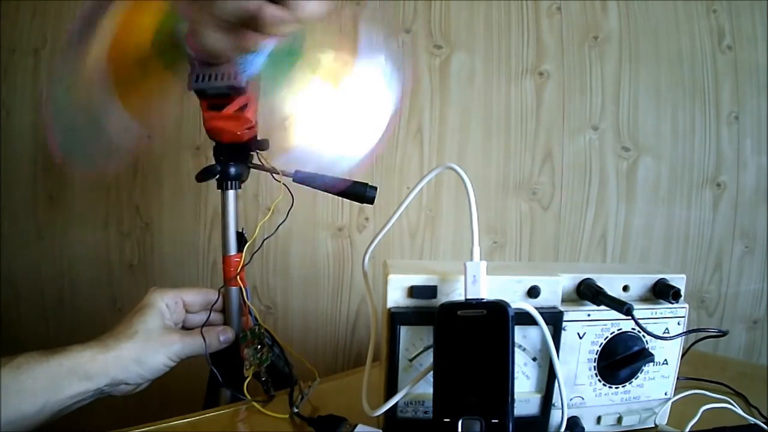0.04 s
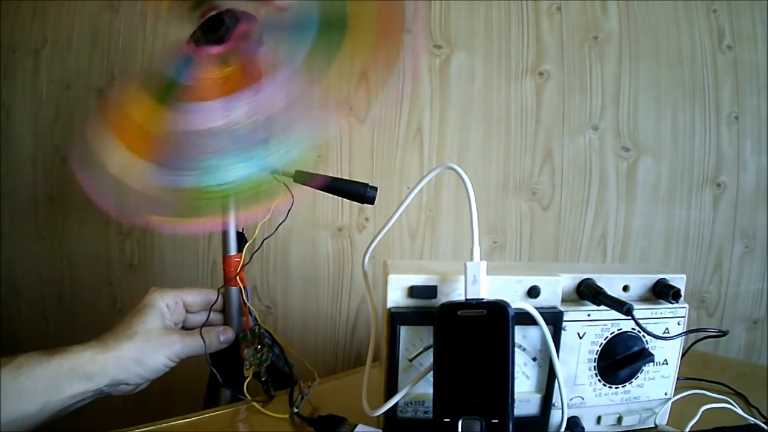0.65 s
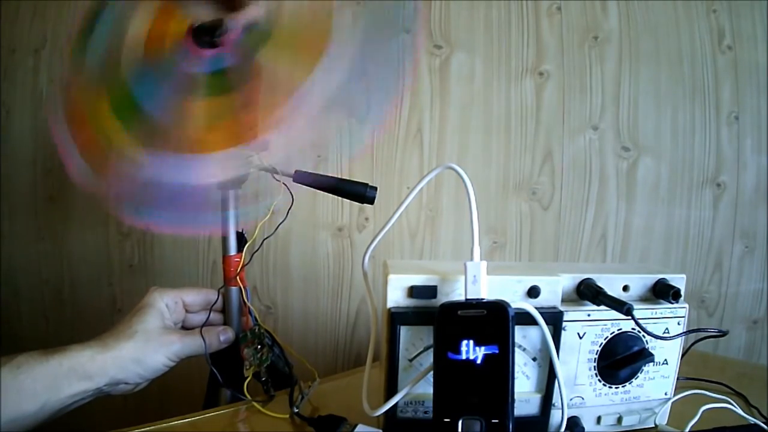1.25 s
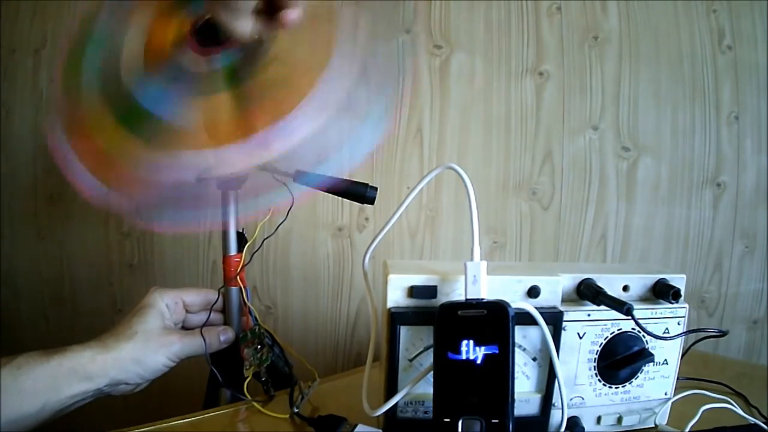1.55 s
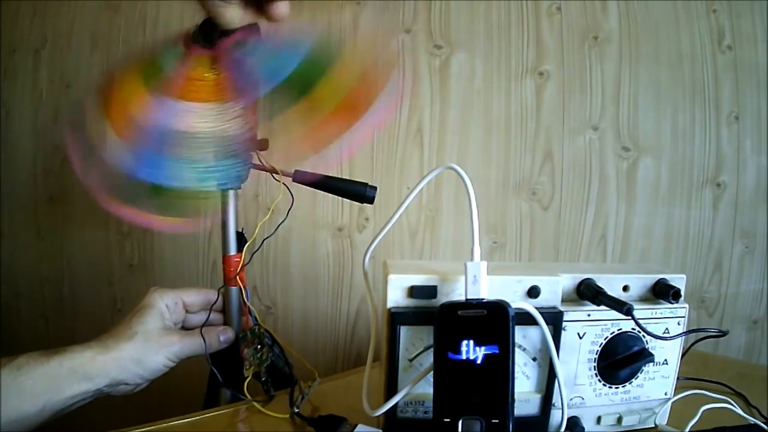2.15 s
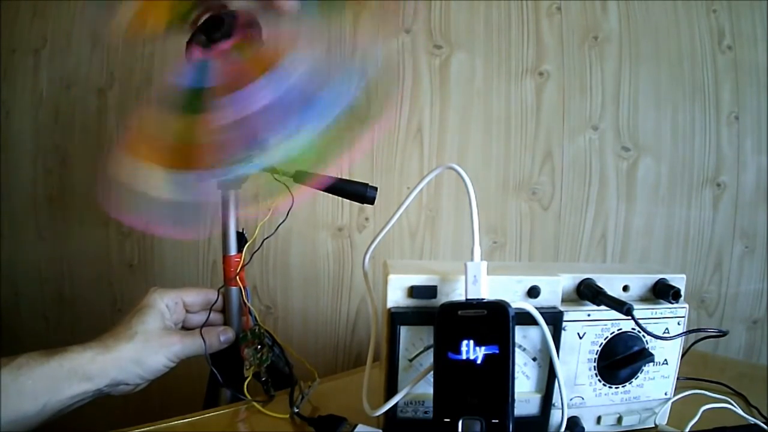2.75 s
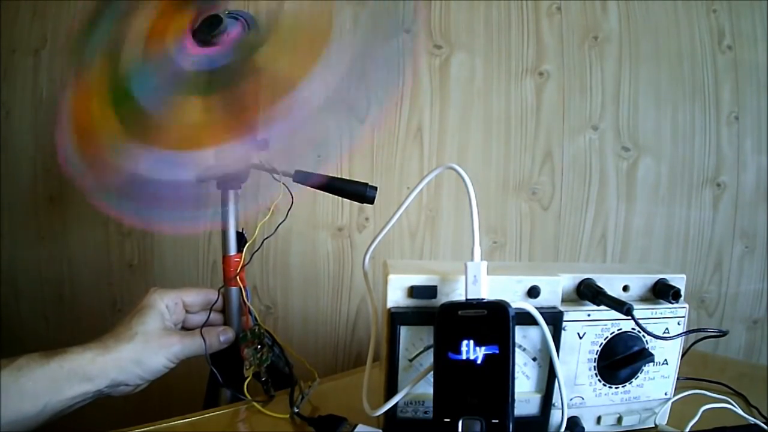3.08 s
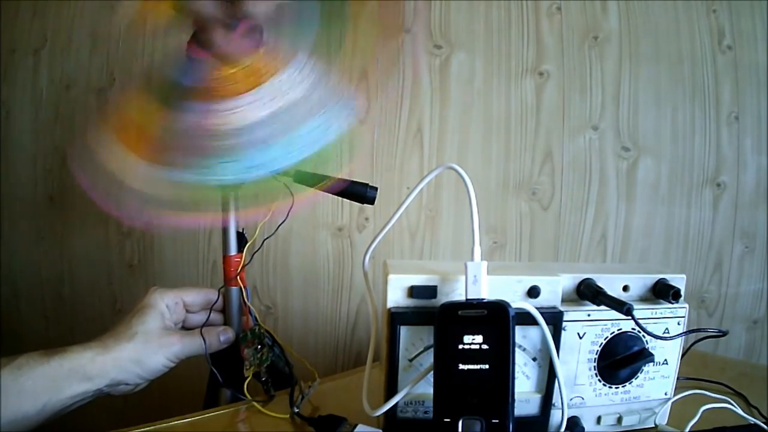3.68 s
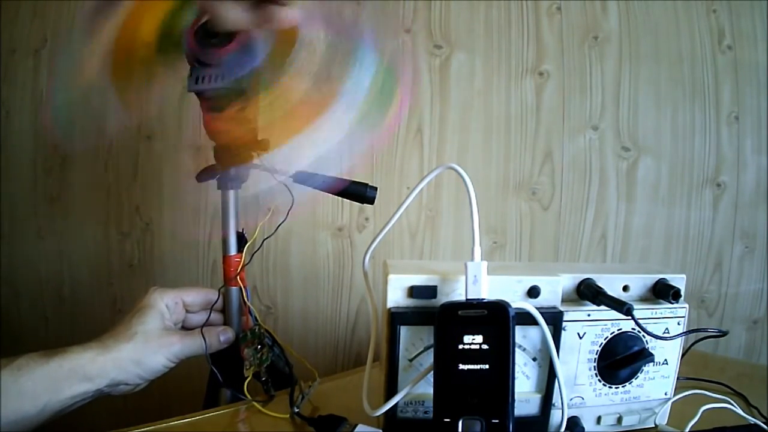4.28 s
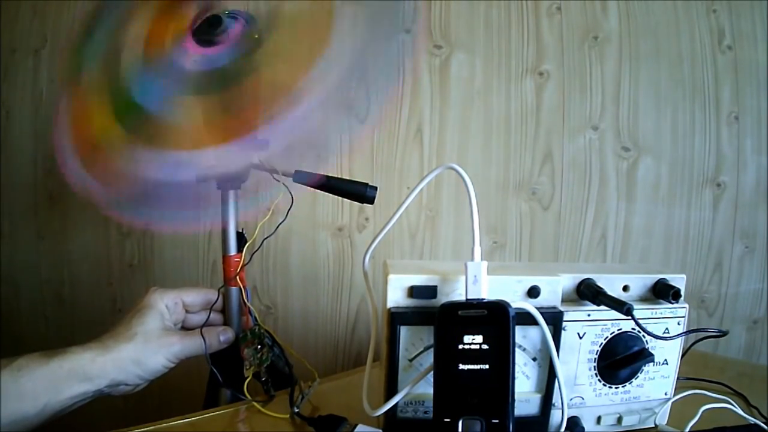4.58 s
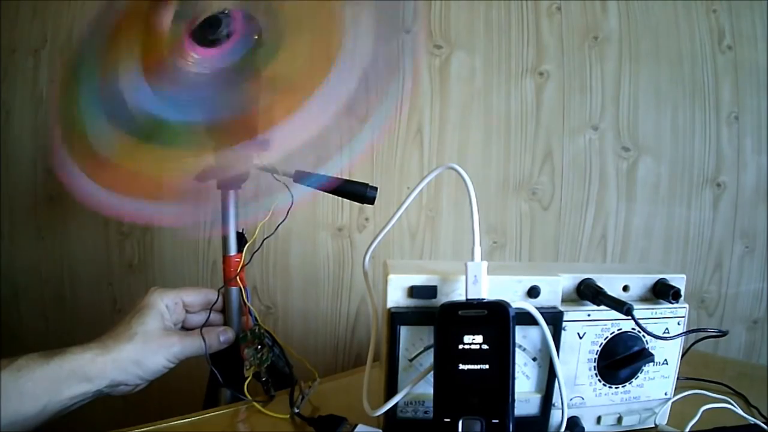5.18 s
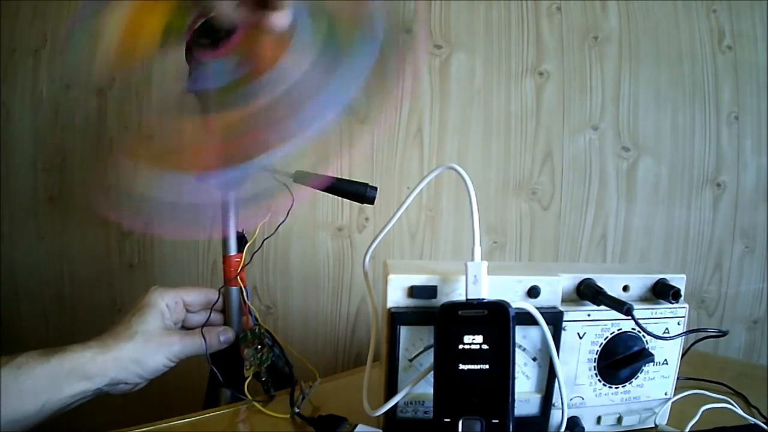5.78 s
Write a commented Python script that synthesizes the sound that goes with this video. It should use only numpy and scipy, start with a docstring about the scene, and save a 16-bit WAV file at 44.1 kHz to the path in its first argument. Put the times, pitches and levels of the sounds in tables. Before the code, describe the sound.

From the start to about 6 seconds, a finger flicks a plastic fan on a small motor round in a steady rhythm, four or five times a second. Each flick is a brief hiss of skin and a plastic rasp, with a hollow rattle of the housing and a clack of the shaft. The blades ring slightly and the rotor whirrs softly in between. The flicks are mostly lighter until about 2 seconds, then firmer, with sharper knocks around 2.5 seconds and from 3.5 to 4.6. Light fingernail taps come near 1.2, 2.5 and 5 seconds. The stand thumps dully through the table with the pushes, with the strongest low boom at about 5.2 seconds. Underneath run a low table rumble, soft room hiss and a faint, thin, fluttering electronic whine. It all sounds close, in a small room.

```python
"""A plastic fan on a small motor, used as a generator on a tripod, is flicked round in a small room.
In each flick a finger lands on the hub, rubs harder until the shaft snaps against its stop, and slides
off: the skin hisses, the plastic rasps, the housing rattles. The stand thumps through the table,
the blades ring and the rotor whirrs on. Underneath lie the low rumble of the handled table,
soft room hiss and the thin electronic whine of a camera."""
import sys
import numpy as np
from scipy import signal
from scipy.fft import rfft, irfft
from scipy.io import wavfile
from scipy.ndimage import uniform_filter1d

SR = 44100
rng = np.random.default_rng(int(sys.argv[2]) if len(sys.argv) > 2 else 0)


def store_wav(level_fs):
    """Save 16-bit WAV to argv[1]."""
    pcm = np.round(np.clip(np.atleast_2d(level_fs), -1, 1) * 32767)
    wavfile.write(sys.argv[1], SR, pcm.T.astype(np.int16))


N = 265923
T = np.arange(N) / SR

# Tone of the room hiss: freq_hz, gain_db
ROOM_TONE_EQ = [(100, 2.5), (200, -6), (350, -8.5), (600, -13), (1000, -19), (1400, -23), (1800, -22.5),
                (3000, -24.5), (5000, -28.5), (9000, -33), (13000, -31.5), (15500, -45)]
# Tone of the table rumble: freq_hz, gain_db
RUMBLE_EQ = [(8, 4), (22, -1), (38, -12), (55, -11), (75, -5), (125, -14.5), (170, -21), (300, -26.5),
             (900, -61.5)]
# How hard the hand shakes the table: time_s, level_db
RUMBLE_FADER = [(.3, -24.5), (.65, -30.5), (1, -27.5), (3, -26.5), (4, -24), (5.2, -27.5), (6, -25.5)]
# Camera whine, on multiples of its line rate: harmonic, level_db
WHINE_HARMONICS = [(1, -52), (2, -54.5), (3, -61.5), (4, -69), (5, -70), (6, -68), (7, -73), (8, -78),
                   (9, -80), (10, -78)]
# High whistle of the electronics: pitch_hz, level_db
WHISTLE_TONES = [(8737, -78), (8883, -73), (8955, -67), (9027, -68), (9098, -78)]
# Tone of the bearings: freq_hz, gain_db
WHIRR_EQ = [(100, -19.5), (250, 14.5), (480, -3.5), (620, 10), (900, -19), (1400, -21), (3000, -44),
            (8000, -46)]
# Boom of the stand and table: pitch_hz, level_db, t60_s
STAND_MODES = [(82, 0, .42), (71, -8, .3), (116, -13, .25), (137, -17, .2)]
# The holding hand shifts the stand between flicks: start_s, level_db
STAND_SHIFTS = [(.913, -24), (1.325, -23), (1.537, -21), (1.77, -28), (2.321, -27), (3.588, -25)]
# Ring of the blades: pitch_hz, width_hz, level_db
BLADE_MODES = [(628, 62, 6.5), (682, 33, -0.5), (731, 28, -2), (858, 31, -2.5), (906, 39, -6.5)]
# Wobbles of the freed rotor: peak_s, level_db
ROTOR_WOBBLES = [(0.216, -36), (.386, -38), (2.133, -39.5), (2.343, -38), (2.71, -36), (3.16, -43),
                 (3.592, -32.5), (3.763, -29.5), (4.25, -41), (4.48, -37.5), (4.839, -45), (5.072, -34.5)]
# Ring of the hub cap: pitch_hz, width_hz, level_db
HUB_MODES = [(2170, 250, -7), (2800, 250, -0.5), (3666, 150, 8), (4100, 1000, -5.5), (6200, 900, -11)]
# Light fingernail taps on the hub: start_s, level_db
NAIL_TAPS = [(1.2146, -36.5), (1.5133, -44), (2.473, -37), (5.0199, -34.5)]
# The loose shaft ticks on its own as it turns: start_s, level_db
LOOSE_TICKS = [(.891, -51), (1.166, -46.5), (1.328, -53), (1.516, -45.5), (2.286, -40)]
# Tone of the shell under a hard knock: freq_hz, gain_db
CLACK_EQ = [(100, -18), (300, 11.5), (500, -8.5), (750, 2), (1150, 7.5), (2200, -2.5), (3000, -6),
            (3800, -2), (4800, -14), (6500, -16.5), (9300, -28), (13000, -61), (16000, -96)]
# Tone of the shell under a soft fingertip: freq_hz, gain_db
BUMP_EQ = [(90, -35), (170, -2.5), (300, 7.5), (480, 6), (700, -10), (1000, -2), (1200, -2), (1600, -16.5),
           (2100, -13.5), (3000, -36.5), (6000, -45), (16000, -61)]
# Ring of the housing and blades: pitch_hz, width_hz, level_db
HOUSING_MODES = [(171, 164, -9), (221.4, 21, -4), (252.7, 28.6, 3.5), (335, 35, 2.5), (390, 29.5, 1.5),
                 (435, 64.6, 0), (502, 69, 0.5), (632, 113, -12), (869, 34, -9)]
# Tone of rubbed plastic: freq_hz, gain_db
RASP_EQ = [(400, -22), (750, -1), (1000, 2.5), (1200, 4), (1550, 2.5), (2000, -5), (2500, -4), (3000, -11),
           (3800, -9), (4800, -14.5), (6500, -19), (9000, -37), (16000, -38)]
# Bright tone of the skin hiss and the shaft's tick: freq_hz, gain_db
BRIGHT_EQ = [(1500, -58), (3500, 2.5), (6000, 4), (8000, 3), (9300, -5), (10500, 1.5), (12000, 1.5),
             (13400, 8), (14500, -8), (16000, -18)]
# Cue sheet, one flick a row; touch_db sets the first contact against the full grip:
# touch_s, snap_s, touch_db, push_db, rasp_db, skin_db, knock_db, thump_db
FLICKS = [(0.108, 0.1482, 2, -32.5, -50, -45, -34, -26.5), (0.329, .368, -5.5, -34.5, -41, -50, -48, -23),
          (0.752, 0.77, -5, -37.5, -51.5, -53, -58, -28.5),
          (0.942, 1.004, -9.5, -37.5, -48.5, -47, -44, -36),
          (1.207, 1.2158, -10, -26.5, -36, -49, -44, -27), (1.387, 1.421, 0.5, -38.5, -54, -58, -56, -28.5),
          (1.609, 1.662, -2, -38.5, -52.5, -69, -54, -32.5), (1.819, 1.859, 0, -38, -72, -54.5, -51, -31.5),
          (2.024, 2.0715, -16, -36.5, -45, -41, -40, -29.5), (2.22, 2.257, -8, -30.5, -38, -46, -44, -22.5),
          (2.432, 2.4752, -11, -28.5, -36.5, -52, -29.5, -28),
          (2.666, 2.687, 8, -41.5, -56.5, -57, -57, -28.5),
          (2.836, 2.8815, -15, -28, -33.5, -46.5, -36, -23),
          (3.051, 3.096, -5, -27, -35.5, -45.5, -42, -24),
          (3.269, 3.299, -2.5, -31.5, -46, -51, -43.5, -30),
          (3.475, 3.504, -16, -27.5, -41.5, -55, -34.5, -20.5),
          (3.698, 3.7285, -3, -30, -42, -47, -31, -20), (3.892, 3.918, -1, -27.5, -37, -48, -27.5, -25),
          (4.136, 4.154, -14.5, -26.5, -40.5, -45.5, -44, -31.5),
          (4.326, 4.3616, -33, -27.5, -29, -40, -28.5, -26.5),
          (4.554, 4.5814, -1.5, -26.5, -31.5, -47, -34.5, -22.5),
          (4.77, 4.803, -6, -31.5, -52, -49, -44, -27.5), (4.985, 5.0204, -9, -28, -40.5, -44.5, -35, -24),
          (5.203, 5.247, -5.5, -29.5, -40, -46, -38.5, -8),
          (5.418, 5.441, 1.5, -29.5, -45, -45.5, -36.5, -19),
          (5.632, 5.6564, -7, -27, -37, -45, -33.5, -27), (5.822, 5.868, -2, -25, -34, -47, -35.5, -18.5)]
TOUCH_S, SNAP_S, TOUCH_DB, PUSH_DB, RASP_DB, SKIN_DB, KNOCK_DB, THUMP_DB = np.transpose(FLICKS)


def undb(db):
    """Decibels to gain."""
    return 10 ** (np.asarray(db) / 20)


def unit_rms(x):
    """Scale to rms 1."""
    return x / np.sqrt(np.mean(x ** 2))


def decay(t, t60):
    """Exponential decay that starts at t = 0."""
    return (t >= 0) * np.exp(-np.log(1000) * np.maximum(t, 0) / t60)


def hits(times, levels_db, t60):
    """Envelope of sharp attacks that each die away."""
    return sum(undb(db) * decay(T - s, t60) for s, db in zip(times, levels_db))


def swells(times, levels_db, width_s):
    """Envelope of short bell-shaped swells."""
    return sum(undb(db) * np.exp(-(2 * (T - s) / width_s) ** 2) for s, db in zip(times, levels_db))


def wander(rate_hz):
    """Random modulation that glides from value to value, with a spread near 1."""
    return np.interp(T * rate_hz, np.arange(4096), rng.standard_normal(4096))


def slips(per_s, spread_db, even_s=0.037):
    """Tiny stick-slip clicks of uneven size, levelled to a power near 1 over even_s."""
    size = undb(spread_db * np.minimum(rng.exponential(size=N), 4))
    clicks = (rng.random(N) < per_s / SR) * size * rng.choice([-1, 1], N)
    power = np.abs(uniform_filter1d(clicks ** 2, int(even_s * SR)))
    return clicks / np.sqrt(power + 1e-9)


def ring(x, response):
    """Pass a sound through an impulse response."""
    return signal.fftconvolve(x, response)[:N]


def eq(x, curve, size=8192):
    """Minimum-phase EQ along a curve; keeps the energy of white noise."""
    hz, db = np.transpose(curve)
    bins_hz = np.arange(size // 2 + 1) * SR / size
    gain_db = np.interp(np.log(bins_hz + 1), np.log(hz), db)
    cepstrum = irfft(np.log(undb(gain_db)))
    cepstrum[1:size // 2] *= 2
    cepstrum[size // 2 + 1:] = 0
    response = irfft(np.exp(rfft(cepstrum)))
    return ring(x, response / np.linalg.norm(response))


def resonate(x, modes):
    """Ring a body's damped modes; keeps the energy of white noise."""
    t = T[:SR // 4]
    response = sum((-1) ** k * undb(db) * width * np.exp(-np.pi * width * t) * np.sin(2 * np.pi * hz * t)
                   for k, (hz, width, db) in enumerate(modes))
    return ring(x, response / np.linalg.norm(response))


def room(x, wet_db, low_t60=0.29, high_t60=0.21, split_hz=7500, predelay_s=0.003):
    """Direct sound plus the diffuse tail of a small room, whose top dies first."""
    t = T[:SR // 2] - predelay_s
    noise = rng.standard_normal(len(t))
    low = signal.sosfiltfilt(signal.butter(2, split_hz, fs=SR, output="sos"), noise)
    tail = low * decay(t, low_t60) + 0.63 * (noise - low) * decay(t, high_t60)
    reverb = ring(x, tail / np.linalg.norm(tail))
    return (x + undb(wet_db) * reverb) / np.hypot(1, undb(wet_db))


def jolts(lead_s=0.0058):
    """Pushes on the stand, just before each snap and from the holding hand: start_s, level_db."""
    return np.vstack([np.transpose([SNAP_S - lead_s, THUMP_DB]), STAND_SHIFTS])


def room_tone():
    """A steady bed of soft hiss."""
    return eq(rng.standard_normal(N), ROOM_TONE_EQ) * undb(-44.5)


def table_rumble(jolt_share=0.32):
    """The handled table rumbles deeply and swells after each jolt."""
    times, levels_db = jolts().T
    shake = unit_rms(uniform_filter1d(hits(times, levels_db / 2, t60=0.21), size=900))
    handling = undb(np.interp(T, *np.transpose(RUMBLE_FADER)))
    return eq(rng.standard_normal(N), RUMBLE_EQ) * handling * (1 - jolt_share + jolt_share * shake)


def camera_whine(frame_hz=22.76, line_hz=1443, duty=0.69, first_frame_s=0.0312):
    """The camera's read-out whines and pauses once a frame, beside a faint steady whistle."""
    frame_phase = ((T - first_frame_s) * frame_hz) % 1
    gate = uniform_filter1d(1. * (frame_phase < duty), size=30)
    line_cycles = line_hz * frame_phase / frame_hz
    whine = sum(undb(db) * np.sin(2 * np.pi * (k * line_cycles + rng.random()))
                for k, db in WHINE_HARMONICS)
    whistle = sum(undb(db) * np.sin(2 * np.pi * (hz * T + rng.random())) for hz, db in WHISTLE_TONES)
    return np.sqrt(2) * (gate * whine + whistle)


def rotor_whirr(coast_t60=0.54):
    """Each flick speeds the rotor up; its bearings whirr and fade as it coasts."""
    speed = hits(SNAP_S, PUSH_DB / 2, coast_t60)
    friction = slips(900, 1.9) * speed * undb(4.6 * wander(35))
    return room(eq(friction, WHIRR_EQ), wet_db=-6.5) * undb(-30.5)


def stand_thumps(attack_s=0.029, rebound_s=0.055, rebound_db=-13):
    """Soft pushes of the hand rock the stand, which booms through the table and rocks back once."""
    t = T[:SR]
    boom = sum(undb(db) * decay(t, t60) * np.sin(2 * np.pi * hz * t) for hz, db, t60 in STAND_MODES)
    pushes = np.zeros(N)
    for start_s, db in jolts():
        pushes[int(start_s * SR)] += undb(db)
        pushes[int((start_s + rebound_s) * SR)] += undb(db + rebound_db)
    return ring(pushes, boom * np.minimum(t / attack_s, 1)) * undb(7)


def blade_chatter(shake_db=-14.5):
    """The shaft chatters in its bearing and rings the blades, at each snap and as the rotor wobbles."""
    shakes = swells(SNAP_S, THUMP_DB + shake_db, width_s=0.024)
    wobbles = swells(*np.transpose(ROTOR_WOBBLES), width_s=0.037)
    return room(resonate((shakes + wobbles) * slips(1200, 2.1), BLADE_MODES), wet_db=-11)


def nail_taps():
    """A nail catches the hub cap, which rings briefly."""
    contact = hits(*np.transpose(NAIL_TAPS), t60=0.024) * slips(7300, 1.3, even_s=0.0036)
    return room(resonate(contact, HUB_MODES), wet_db=-6) * undb(12.5)


def shaft_knocks(clack_lag_s=0.00078):
    """The shaft hits its stop or knocks loosely: a bright tick, then the clack of the plastic shell."""
    times, levels_db = np.vstack([np.transpose([SNAP_S, KNOCK_DB]), LOOSE_TICKS]).T
    tick = hits(times, levels_db, t60=0.017)
    clack = hits(times + clack_lag_s, levels_db, t60=0.038)
    # each contact builds over a few milliseconds and is a burst of tiny bounces
    tick = uniform_filter1d(tick, size=130) * slips(6000, 3.5, even_s=0.003)
    clack = uniform_filter1d(clack, size=150) * slips(4000, 3, even_s=0.005)
    tick = room(eq(tick, BRIGHT_EQ), wet_db=-5) * undb(9)
    clack = room(eq(clack, CLACK_EQ), wet_db=-4.5) * undb(11.5)
    return tick + clack


def fingertip_bumps(t60=0.079, snap_lag_s=0.008, lift_lag_s=0.042):
    """A soft fingertip draws a dull clack from the hollow shell: on landing, at the snap, on lifting."""
    landing = hits(TOUCH_S, PUSH_DB + TOUCH_DB - 2, t60)
    snap = hits(SNAP_S + snap_lag_s, PUSH_DB - 6.5, t60)
    lift = hits(SNAP_S + lift_lag_s, PUSH_DB - 10.5, t60)
    contact = (landing + snap + lift) * slips(3000, 0.76, even_s=0.0039)
    return room(eq(contact, BUMP_EQ), wet_db=-2) * undb(5)


def finger_pressure(levels_db, hold_s, release_t60, touch_weight, grip_curve=1.5):
    """Envelope of one friction layer: sudden touch, grip tightening to the snap, hold, slide-off."""
    envelope = np.zeros(N)
    for touch_s, snap_s, touch_db, db in zip(TOUCH_S, SNAP_S, TOUCH_DB, levels_db):
        start = int(touch_s * SR)
        span = slice(start, start + SR // 2)
        grip = np.clip((T[span] - touch_s) / (snap_s - touch_s), 0, 1) ** grip_curve
        release = decay(np.maximum(T[span] - snap_s - hold_s, 0), release_t60)
        envelope[span] += undb(db + touch_weight * touch_db * (1 - grip)) * release
    return envelope


def finger_flicks():
    """Skin sticks and slips on the hub: it hisses, the plastic rasps and the housing rattles longest."""
    push = finger_pressure(PUSH_DB, hold_s=0.021, release_t60=0.18, touch_weight=0.5)
    rub = finger_pressure(RASP_DB, hold_s=0.026, release_t60=0.12, touch_weight=1.22)
    brush = finger_pressure(SKIN_DB, hold_s=0.0069, release_t60=0.075, touch_weight=0.76)
    judder = unit_rms(undb(3 * wander(240)))
    rattle = resonate(slips(1100, 2.3, even_s=0.011) * judder * push, HOUSING_MODES)
    rasp = eq(slips(600, 3.8, even_s=0.015) * judder * rub, RASP_EQ)
    hiss = eq(slips(3000, 3.6, even_s=0.0089) * judder * brush, BRIGHT_EQ)
    return room(rattle, wet_db=-8) * undb(-1) + room(rasp, wet_db=-4) + room(hiss, wet_db=-2.5)


def scene():
    """Mono mix: the contacts on the hub, the fan and stand answering, and the bed beneath."""
    contacts = finger_flicks() + fingertip_bumps() + shaft_knocks() + nail_taps()
    body = blade_chatter() + stand_thumps() + rotor_whirr()
    bed = room_tone() + table_rumble() + camera_whine()
    return (contacts + body + bed)[None]


def record(dry, cutoff_hz=15700):
    """A steep low-pass trims the very top."""
    return signal.sosfilt(signal.ellip(8, 0.2, 80, cutoff_hz, fs=SR, output="sos"), dry)


dry = scene()
out = record(dry)
store_wav(out)
```